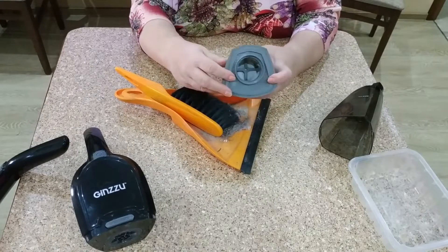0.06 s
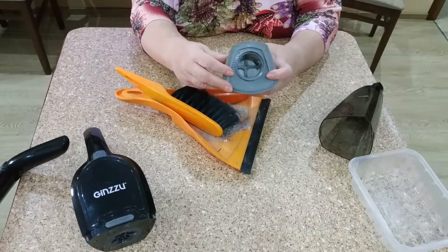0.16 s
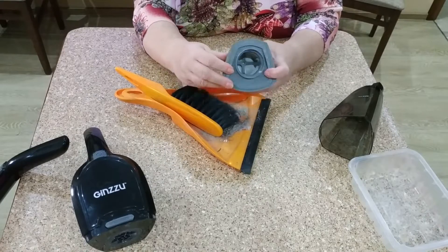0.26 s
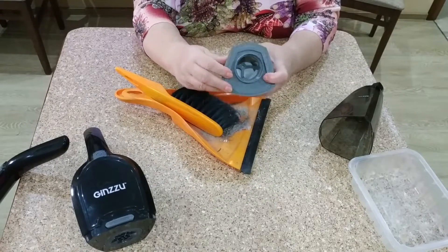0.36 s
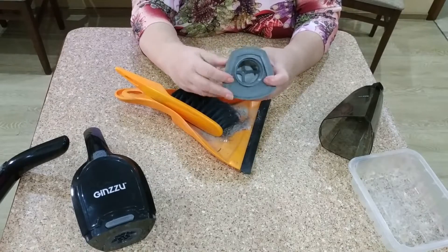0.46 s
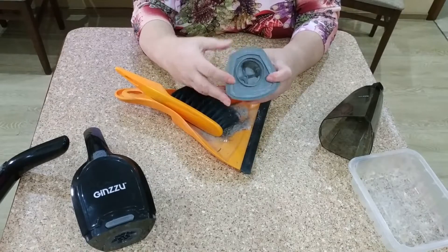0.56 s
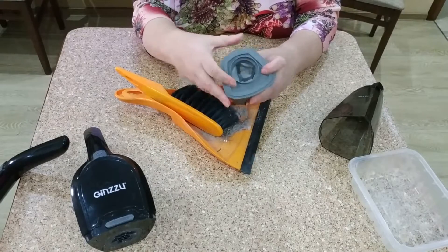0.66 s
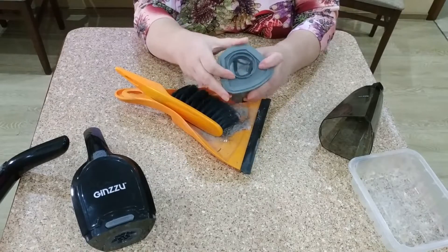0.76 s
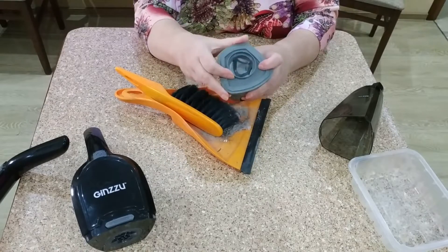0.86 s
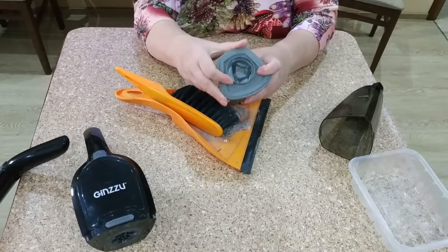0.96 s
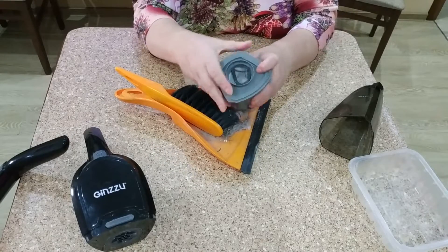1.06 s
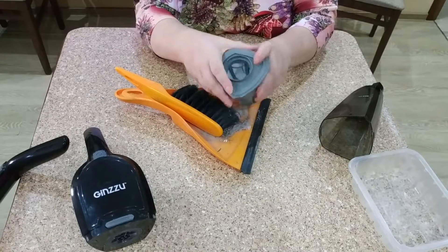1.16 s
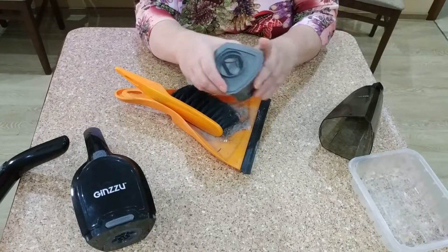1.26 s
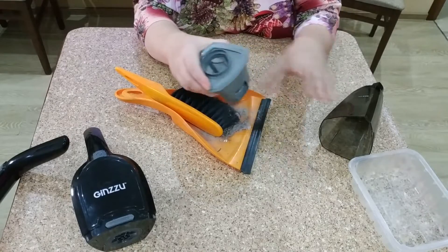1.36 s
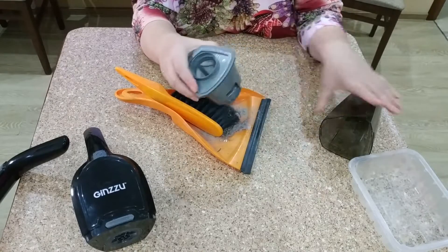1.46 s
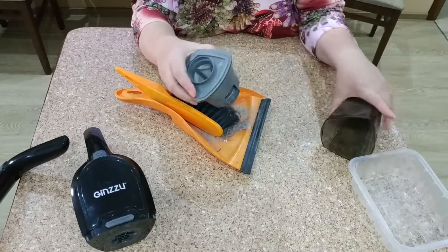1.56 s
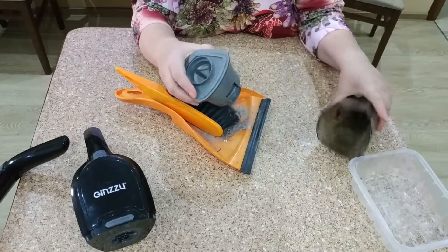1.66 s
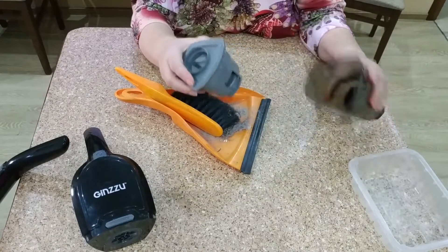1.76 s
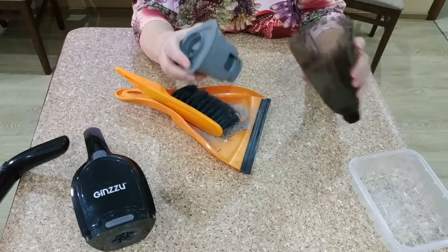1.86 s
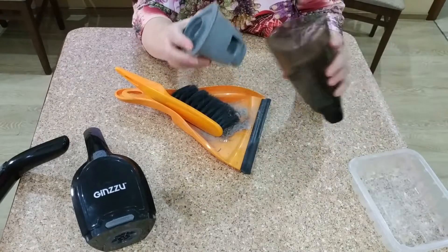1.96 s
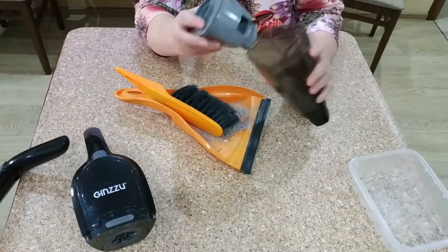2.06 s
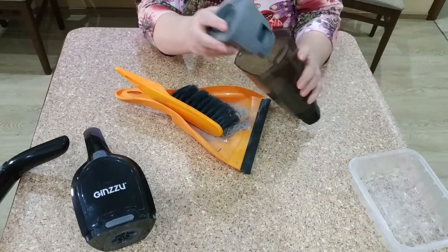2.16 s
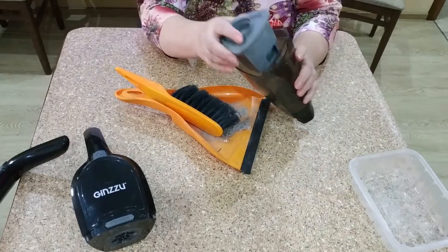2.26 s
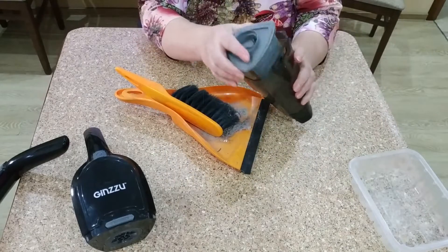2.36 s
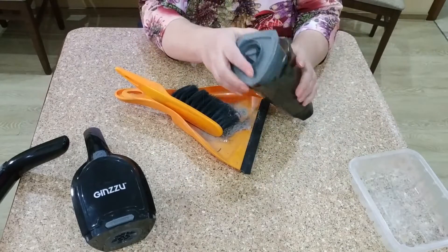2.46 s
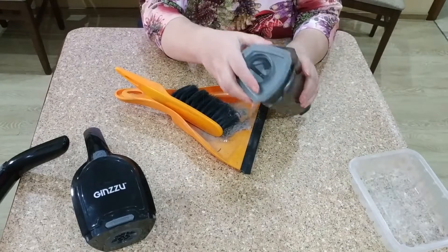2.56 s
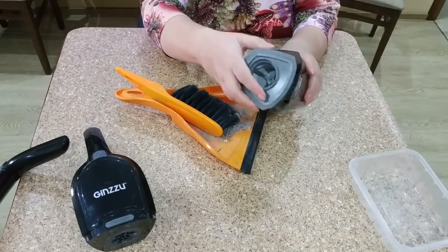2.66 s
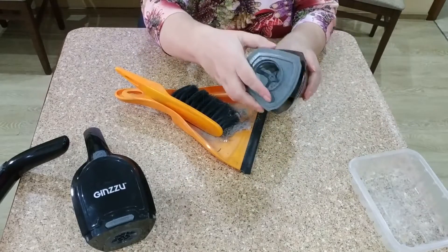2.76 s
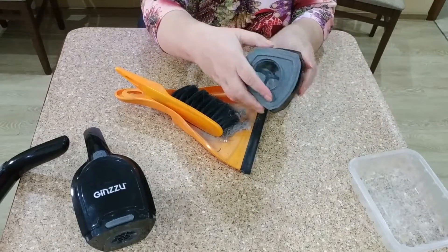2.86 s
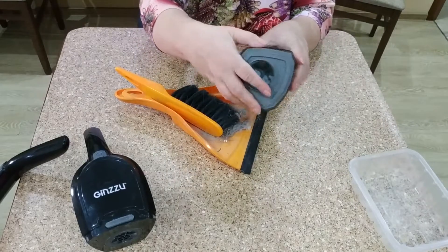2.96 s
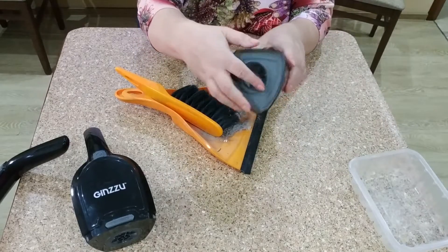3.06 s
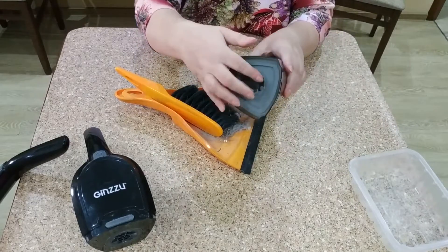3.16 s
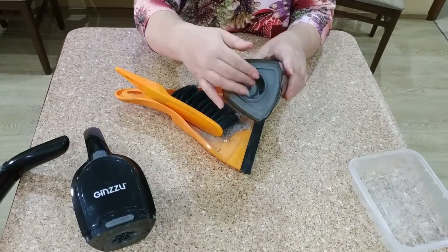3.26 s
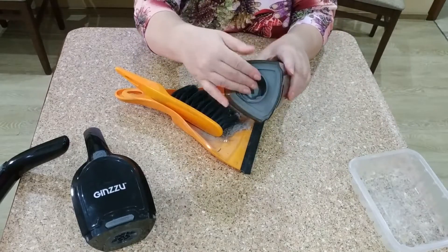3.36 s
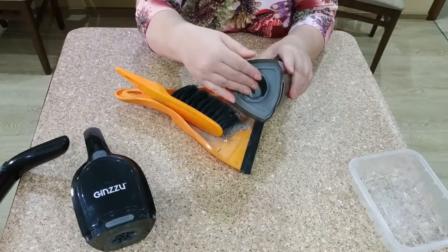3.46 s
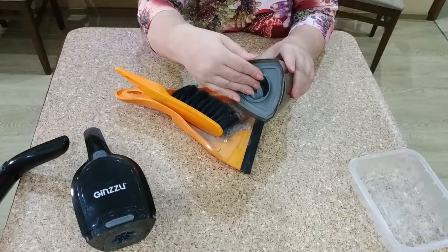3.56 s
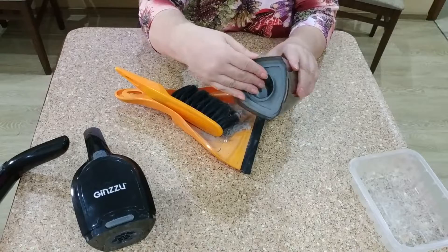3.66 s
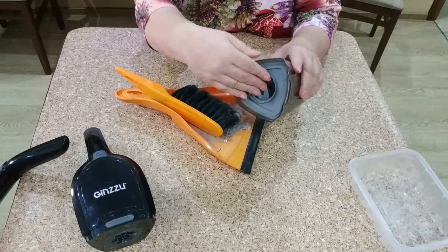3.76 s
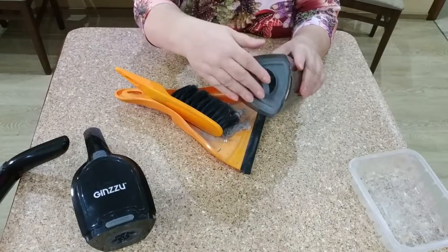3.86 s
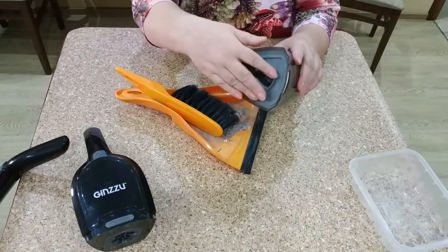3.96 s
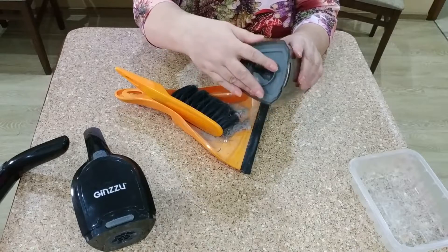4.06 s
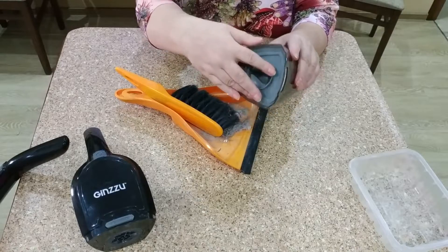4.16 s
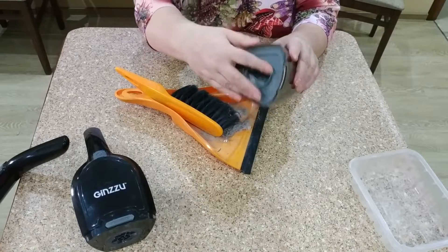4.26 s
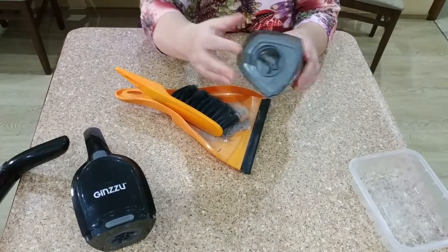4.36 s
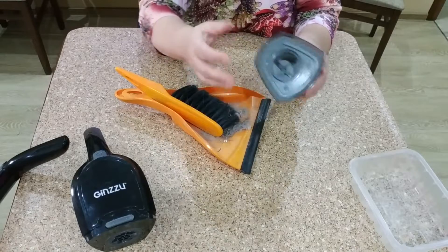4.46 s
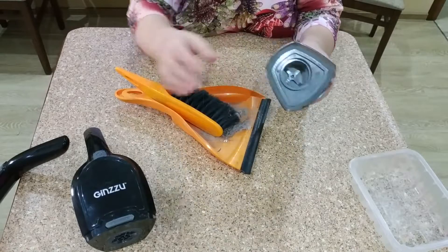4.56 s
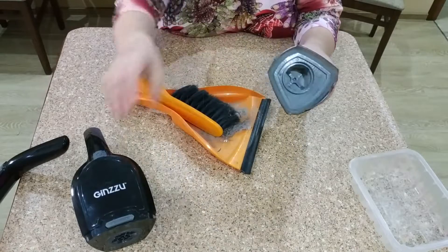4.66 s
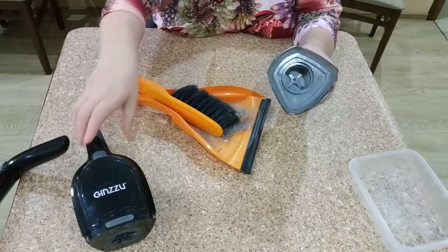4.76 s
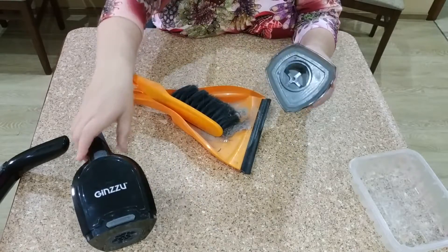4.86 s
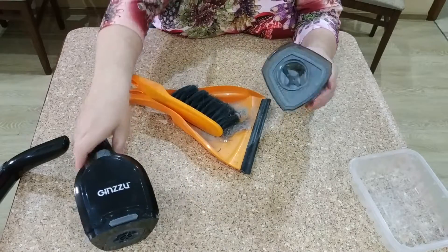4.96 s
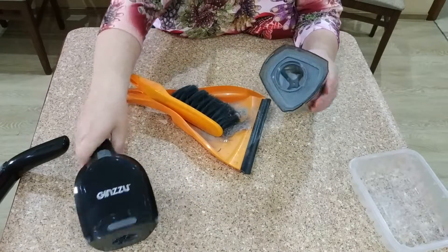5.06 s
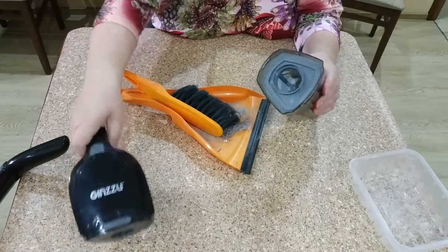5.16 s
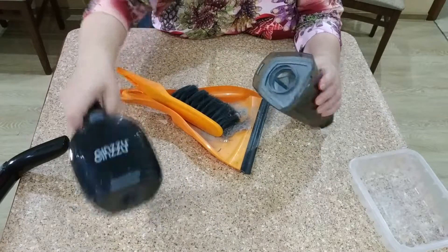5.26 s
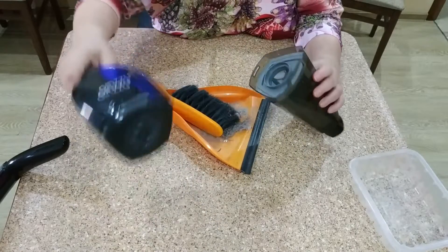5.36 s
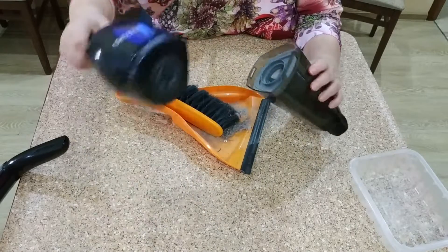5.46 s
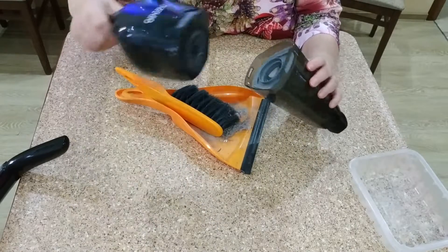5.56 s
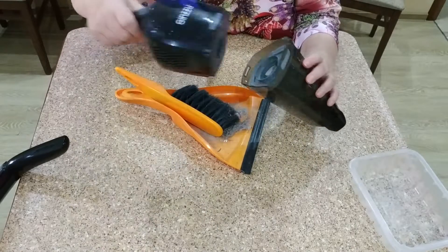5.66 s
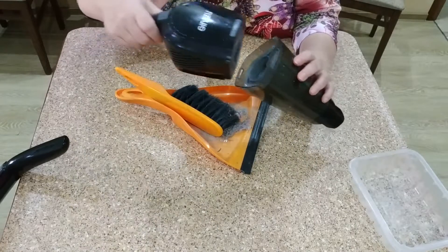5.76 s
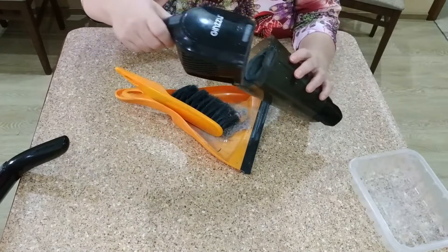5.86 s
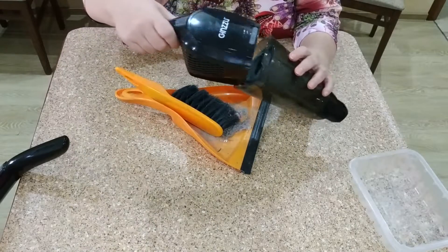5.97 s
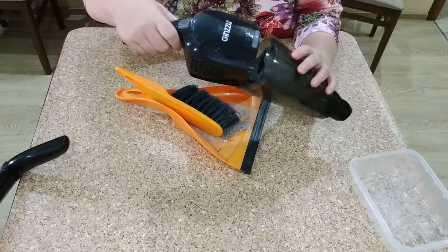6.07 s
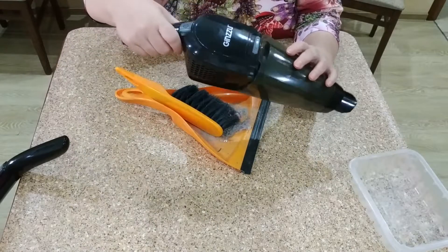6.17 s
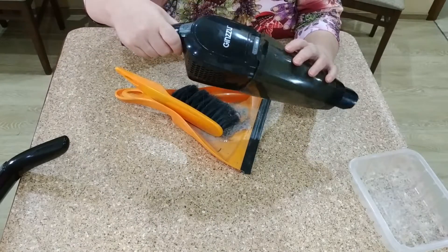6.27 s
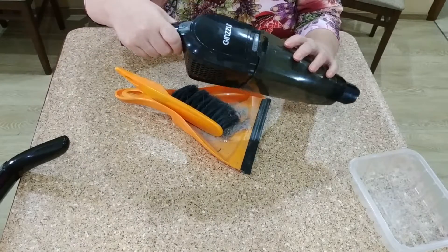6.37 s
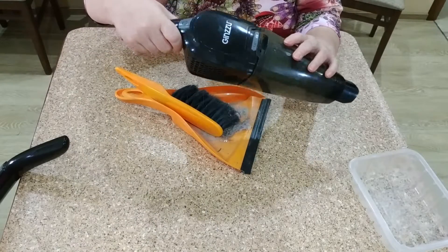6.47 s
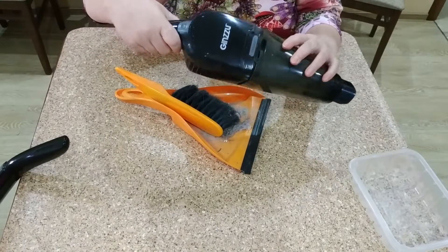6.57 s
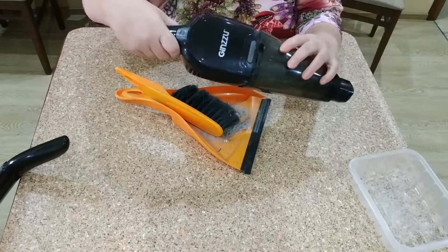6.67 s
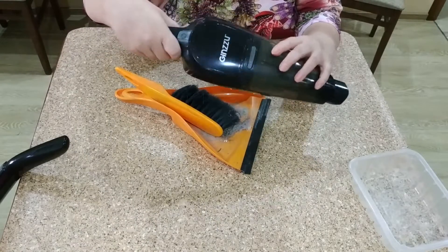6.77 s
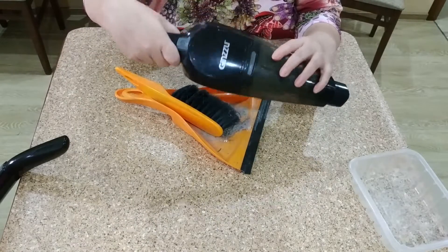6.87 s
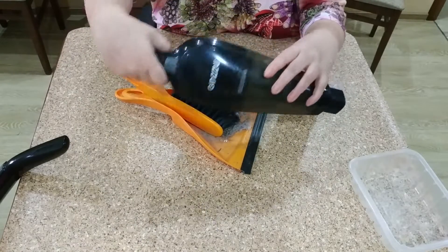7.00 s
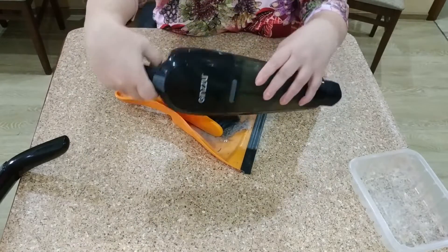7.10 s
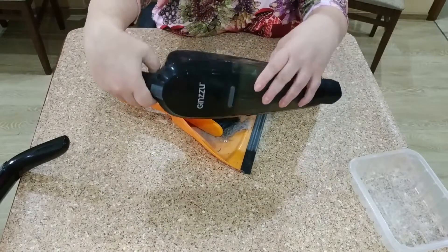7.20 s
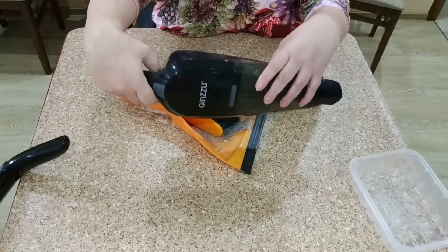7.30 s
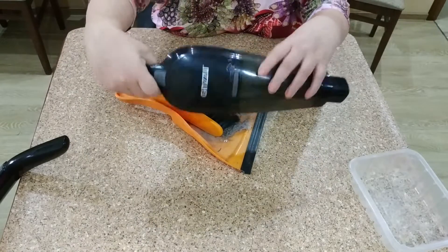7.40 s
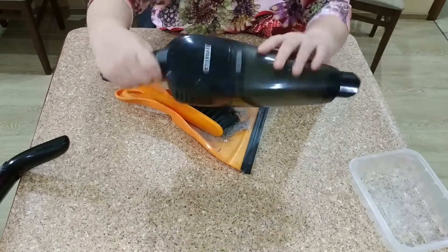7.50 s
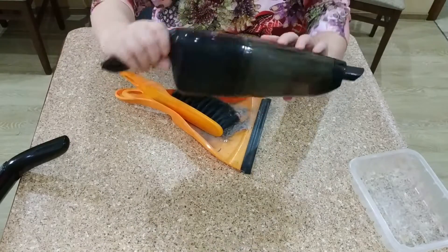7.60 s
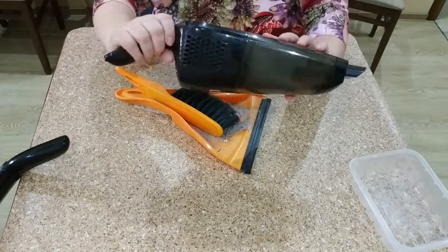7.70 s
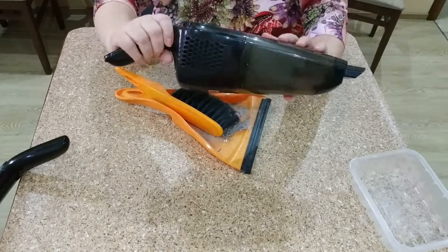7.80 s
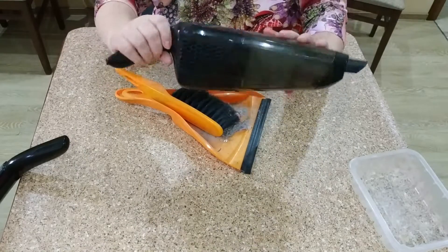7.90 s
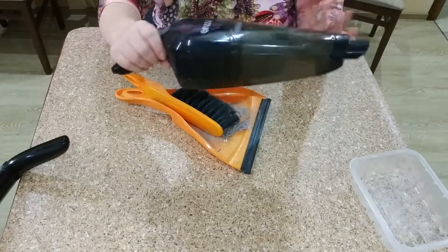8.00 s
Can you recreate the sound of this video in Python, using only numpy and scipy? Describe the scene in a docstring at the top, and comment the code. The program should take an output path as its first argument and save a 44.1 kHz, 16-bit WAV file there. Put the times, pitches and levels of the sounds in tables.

```python
"""Fingers rub plastic, then hollow knocks and sharp cracks: hands fit a filter into the dust cup of a small
vacuum cleaner and snap the cup onto the motor body, over a table in a bare, live room.
Blows excite decaying shell modes, latches add bursts of bright noise, and sliding skin is shaped noise.
Dense decaying noise forms the room; a microphone with a limiter hears it all over hiss and low room tone."""
import sys
import numpy as np
from scipy import signal
from scipy.fft import rfft, irfft
from scipy.io import wavfile
from scipy.ndimage import uniform_filter1d, minimum_filter1d

SR = 44100
rng = np.random.default_rng(int(sys.argv[2]) if len(sys.argv) > 2 else 0)


def bounce(signal):
    """Save signal as a 16-bit WAV file at the path given by the first command-line argument."""
    frames = np.transpose(np.atleast_2d(signal))
    limited = np.clip(frames, -1, 1)
    pcm = np.round(limited * 32767).astype(np.int16)
    wavfile.write(sys.argv[1], SR, pcm)


def boost_factor(decibels):
    """Convert a level in decibels to a linear amplitude factor."""
    exponent = np.asarray(decibels, float) / 20
    return 10 ** exponent


N = 354475   # length [samples]


def knocks():
    """Modal excitation by blunt blows: the air in the shell booms, its walls ring above."""
    # blows on the shells: (time [s], hollow drive [dB], hollow centre [Hz], wall drive [dB], wall centre [Hz])
    blow_table = [ (.352, -38.5, 287, -25, 950), (0.362, -57, 372, -33, 835), (.535, -58, 293, -45, 860),
                  (0.643, -59, 364, -44.5, 835), (1.295, -66, 520, -41.5, 1080),
                  (1.525, -70, 324, -38, 980), (1.685, -46, 244, -63, 1200), (1.755, -34, 302, -36.5, 1110),
                  (1.766, -20.5, 229, -30.5, 650), (1.791, -31, 310, -42, 635),
                  (2.382, -26.5, 562, -20, 890), (2.418, -36, 540, -46, 845),
                  (2.598, -15.5, 436, -36.5, 1500), (2.637, -27.5, 416, -30, 780),
                  (3.006, -17, 431, -6, 825), (3.023, -11, 425, -7.5, 798), (3.554, -55, 304, -41.5, 750),
                  (4.351, -45.5, 303, -51, 767), (4.629, -54, 310, -45, 829), (4.897, -33, 222, -27.5, 940),
                  (5.445, -53.5, 260, -44.5, 654), (5.619, -65, 362, -45.5, 829),
                  (5.978, -29.5, 340, -31, 950), (5.989, -22, 362, -24, 776), (6.107, -21, 333, -17.5, 970),
                  (6.118, -22, 306, -21, 716), (6.246, -9.5, 319, -10.5, 890),
                  (6.261, -40, 362, -47.5, 865), (6.34, -50, 356, -20.5, 960), (6.639, -57, 303, -41, 855),
                  (6.749, -29, 300, -19.5, 637), (6.773, -25, 306, -21, 930), (6.7826, -12, 342, 5.5, 924),
                  (7.7, -46.5, 300, -48, 810), (7.917, -55, 390, -45, 1510), (7.98, -57, 360, -48, 781)]
    time_s, hollow_db, hollow_hz, wall_db, wall_hz = np.transpose(blow_table)
    hollow_top_hz, wall_top_hz = 620, 1600
    hollow = strike(time_s, hollow_db, hollow_hz, 0, hollow_top_hz, fall_db=35.0, soft_hz=646)
    walls = strike(time_s, wall_db, wall_hz, hollow_top_hz, wall_top_hz, fall_db=40.3, soft_hz=1400)
    return hollow + walls


def cracks():
    """Impulsive radiation: thin high modes clack, and bright splinter noise swells and dies in each ear."""
    # hard edges and latches snapping:
    # (start [s], crack peak drive [dB], clack drive [dB], clack centre [Hz], left over right in the crack [dB])
    snap_table = [ (0.3491, -31.5, -36, 1760, -5), (0.381, -24.5, -46, 3000, 0),
                  (.539, -42, -49, 2980, 3.5), (0.834, -45, -50, 3550, -3), (1.293, -45, -55, 1660, -1),
                  (1.324, -49, -67, 4210, 1), (1.611, -33.5, -53, 2170, 1), (1.7578, -34.5, -39, 2030, 11),
                  (1.7646, -26.5, -28, 1930, 1), (2.3807, -39, -35.5, 1860, 3),
                  (2.6019, -36, -31, 1990, -2.5), (3.006, -29, -16, 2110, 3), (3.023, -31, -32, 1940, -4.5),
                  (3.065, -27, -24.5, 3080, -5.5), (3.072, -39, -15.5, 3150, -2),
                  (3.08, -15.5, -32.5, 2940, 4), (3.866, -46, -63, 3000, 0), (4.341, -36, -47.5, 3450, 3),
                  (4.8635, -45, -64, 1770, -3), (4.897, -18, -34, 1800, -1.5),
                  (5.1947, -32.5, -49, 1700, -3), (5.3522, -49, -46.5, 2060, 2),
                  (5.9772, -21.5, -32, 2790, -3), (5.989, -46, -26.5, 2780, 6),
                  (6.1072, -24.5, -25.5, 4000, -13), (6.118, -15, -18, 2870, 5),
                  (6.246, -25.5, -17.5, 2030, -14), (6.2722, -32, -44, 1680, 17),
                  (6.3391, -21, -35, 3000, -3), (6.3414, -20, -18.5, 2280, 0.5),
                  (6.749, -23.5, -30.5, 1700, 5), (6.769, -16, -16, 1980, 5), (6.781, 4, -15, 3300, -8.5),
                  (6.7836, 7, 0.5, 2350, 3), (7.46, -38.5, -62, 3790, 1), (7.555, -58, -44, 1660, -5),
                  (7.7225, -35.5, -41, 2200, -5), (7.918, -38.5, -34, 2040, 2),
                  (7.982, -36.5, -42, 3450, -8)]
    time_s, crack_db, clack_db, clack_hz, pan_db = np.transpose(snap_table)
    swell_s = 0.0005   # time a crack takes to reach its peak
    t = np.arange(2000) / SR / swell_s
    pulse = np.e * t * np.exp(-t)   # peaks at 1
    envelope = np.zeros((2, N + len(t)))
    for start, db, pan in zip(np.round(time_s * SR).astype(int), crack_db, pan_db):
        ear_db = db + np.array([[pan], [-pan]]) / 2
        envelope[:, start:start + len(t)] += boost_factor(ear_db) * pulse
    mid, side = rng.standard_normal((2, N))
    white = 0.6 * mid + 0.6 * side * [[1], [-1]]   # the ears are uncorrelated
    bright = signal.sosfilt(signal.butter(2, 3000, "high", fs=SR, output="sos"), white)
    clack = strike(time_s, clack_db, clack_hz, 1600, SR, fall_db=15.5, soft_hz=4300)
    return envelope[:, :N] * bright + clack


def strike(time_s, level_db, centre_hz, low_hz, high_hz, fall_db, soft_hz):
    """Modal superposition: a blow drives damped resonators, less so (fall_db per octave) far from its centre."""
    # modes of the plastic shells and the air in them: (frequency [Hz], level [dB], decay by 60 dB [s])
    shell_modes = [(165, -19.5, .08), (211, -2.5, 0.081), (259, 10, 0.036), (300, -5.5, 0.21),
                   (362, 2, 0.12), (417.7, 0.5, 0.1), (440, 1.5, 0.054), (540, 6, 0.06), (580, 5.5, 0.14),
                   (653, -6.5, 0.045), (720, -7, 0.11), (785, -6, 0.063), (835, -7.5, 0.11),
                   (920, -4, 0.04), (980, -11, 0.039), (1124, 2.5, 0.024), (1272, 4.5, 0.032),
                   (1463, 11, 0.032), (1666, 4, 0.0086), (1912, -5, 0.031), (2058, -10.5, 0.04),
                   (2190, -5.5, 0.013), (2514, 4.5, 0.0029), (2780, -3.5, 0.018), (3150, -4, 0.016),
                   (3550, -2, 0.015), (4000, -3, 0.0063), (4770, 11, 0.0025)]
    onset = np.round(time_s * SR).astype(int)
    ringing = np.zeros(N)
    luck = rng.standard_normal((len(time_s), len(shell_modes)))
    for k, (hz, mode_db, t60_s) in enumerate(shell_modes):
        if low_hz <= hz < high_hz:
            octaves_off = np.minimum(np.abs(np.log2(hz / centre_hz)), .55)
            drive_db = level_db + mode_db - fall_db * octaves_off + 2.0 * luck[:, k]
            clicks = np.full(N, 1e-18)
            clicks[onset] = boost_factor(drive_db) * np.sign(luck[:, k - 1])   # random polarity
            radius = boost_factor(-60 / (t60_s * SR))
            angle = 2 * np.pi * hz / SR
            poles = [1, -2 * radius * np.cos(angle), radius ** 2]
            # the zeros: a small shell radiates little below its mode
            ringing += signal.lfilter([.5, 0, -.5], poles, clicks)
    soft = np.exp(-2 * np.pi * soft_hz / SR)   # the contact lasts a moment, which rounds the attack
    return signal.lfilter([(1 - soft) ** 2], [1, -2 * soft, soft ** 2], ringing)


def rubbing():
    """Stick-slip friction: skin slides in a dense hiss of tiny slips; the shells answer with duller creaks."""
    # fingers and sleeves sliding on plastic: (loudest moment [s], length [s], swish level [dB], creak level [dB])
    stroke_table = [ (.01, 0.16, -52, -56), (0.131, 0.11, -49, -66), (0.316, 0.12, -59, -52),
                    (0.773, 0.42, -55, -68), (1.087, 0.11, -42.5, -64), (1.188, 0.069, -48, -63),
                    (1.294, 0.26, -49, -80), (1.512, 0.17, -50.5, -57), (1.643, 0.17, -52, -56),
                    (2.154, 0.14, -56.5, -64), (2.24, .12, -55, -91), (2.58, 0.48, -48.5, -53),
                    (2.85, 0.29, -50.5, -65), (2.982, 0.25, -47.5, -55.5), (3.343, 0.23, -53, -81),
                    (3.56, 0.21, -57, -55), (3.86, .2, -56, -68), (4.064, .1, -49, -55.5),
                    (4.363, 0.14, -45, -53.5), (4.636, 0.095, -89, -52.5), (5.04, 0.59, -50.5, -86),
                    (5.215, 0.11, -47, -50), (5.415, 0.41, -54, -69), (5.623, 0.11, -56.5, -66),
                    (5.85, 0.38, -82, -63), (6.628, 0.16, -78, -58), (7.17, 0.63, -53.5, -61.5),
                    (7.47, 0.13, -58, -65.5), (7.62, 0.27, -52, -57), (7.73, .12, -56, -70),
                    (7.993, .2, -54, -58.5)]
    # spectrum of the slips: (frequency [Hz], relative level per Hz [dB])
    swish_colour = [(880, -30.5), (1500, -1.5), (1920, -6), (5170, -6), (6760, -5), (11900, -1.5),
                    (15100, -3.5), (16000, 5)]
    # spectrum of the shells' answer: (frequency [Hz], relative level per Hz [dB])
    creak_colour = [(250, -8), (350, -4), (850, -0.5), (1100, -1.5), (2000, -11), (3500, -20)]
    time_s, length_s, swish_db, creak_db = np.transpose(stroke_table)
    rise_share, end_drop_db = 0.49, 20.5   # part of the length spent swelling; how far down the ends are
    rise = end_drop_db / (rise_share * length_s)
    fall = end_drop_db / ((1 - rise_share) * length_s)
    slips = rng.standard_normal(N) * boost_factor(2.0 * drift(40.0))
    sparse = rng.random(N) < 300 / SR   # about 300 stronger grains a second
    grains = rng.standard_normal(N) * (0.9 + sparse * 2.7) * boost_factor(6.6 * drift(28.0))
    # the hands never quite rest, so each envelope keeps a floor
    swish_envelope = np.hypot(peaked(time_s, swish_db, rise, fall), boost_factor(-67))
    creak_envelope = np.hypot(peaked(time_s, creak_db, rise, fall), boost_factor(-74.5))
    swish = swish_envelope * coloured(slips, swish_colour)
    return swish + creak_envelope * coloured(grains, creak_colour)


def table_top():
    """Structure-borne sound: the table top rumbles briefly as parts thud, drag or lift on it."""
    # jolts of the table top: (loudest moment [s], level [dB])
    jolt_table = [(1.5, -55), (1.634, -52.5), (1.77, -34), (4.902, -55), (5.2, -54)]
    # spectrum of the rumble: (frequency [Hz], relative level per Hz [dB])
    rumble_colour = [(110, 5), (150, 1), (200, 6.5), (300, -5), (600, -27)]
    time_s, level_db = np.transpose(jolt_table)
    envelope = peaked(time_s, level_db, rise_db_per_s=1100, fall_db_per_s=330)
    return envelope * coloured(rng.standard_normal(N), rumble_colour)


def peaked(time_s, level_db, rise_db_per_s, fall_db_per_s):
    """Power summation of envelopes that climb to a peak and fall from it in straight dB lines."""
    power, t = np.zeros(N), np.arange(N) / SR
    for peak_s, db, rise, fall in np.broadcast(time_s, level_db, rise_db_per_s, fall_db_per_s):
        near = slice(max(int((peak_s - .5) * SR), 0), int((peak_s + .5) * SR))
        down_db = np.maximum(rise * (peak_s - t[near]), fall * (t[near] - peak_s))
        power[near] += boost_factor(db - down_db) ** 2
    return np.sqrt(power)


def coloured(white, spectrum):
    """Spectral shaping: multiply the Fourier transform of a noise by a spectrum; rms 1."""
    hz = np.maximum(np.arange(N // 2 + 1) * SR / N, 20)
    slope_db = -24 * np.maximum(np.log2(spectrum[0][0] / hz), 0)   # 24 dB per octave below the first point
    return rms_one(irfft(rfft(white) * boost_factor(at_hz(spectrum, hz) + slope_db), N))


def room(direct):
    """Diffuse reverberation: convolve with noise that builds up, then decays at its own rate in each band."""
    # reverberation time: (frequency [Hz], decay by 60 dB [s])
    decay_times = [(150, 0.4), (400, 0.36), (1000, 0.43), (3000, 0.43), (8000, 0.34), (15000, 0.21)]
    # colour of the reverberation: (frequency [Hz], relative level [dB])
    tail_colour = [(150, -0.5), (400, 2), (1000, 2), (3000, 5.5), (8000, 4.5), (15000, 5)]
    # likeness of the ears in the reverberation: (frequency [Hz], left-right correlation [0 to 1])
    tail_likeness = [(100, .96), (250, .84), (500, .7), (1000, .25), (2000, .1), (8000, .05)]
    t = np.arange(SR) / SR
    tail = np.zeros((2, SR))
    for hz, band in noise_bands(tail_likeness, size=SR):
        tail += band * boost_factor(at_hz(tail_colour, hz) - 60 * t / at_hz(decay_times, hz))
    tail *= np.clip(t / 0.0037, .45, 1)   # the table top answers at once, the walls later
    tail /= np.sqrt(np.mean(np.sum(tail ** 2, axis=1)))   # unit energy
    return signal.fftconvolve(direct, tail, axes=1)[:, :N]


def still_air():
    """Stationary background noise: room tone and microphone hiss, slightly unsteady in each band."""
    # spectrum of room tone and hiss: (frequency [Hz], relative level per Hz [dB])
    still_colour = [(60, -40), (96, -55), (176, -0.5), (305, 4), (503, -5), (1020, -3), (1370, -9.5),
                    (3650, -9), (5180, -12), (12100, -11.5), (14800, -9), (16000, -32.5)]
    # likeness of the ears in the background: (frequency [Hz], left-right correlation [0 to 1])
    still_likeness = [(60, 0.52), (180, 0.63), (550, 0.12), (1650, 0.047), (4970, 0.031), (15000, 0.02)]
    noise = np.zeros((2, N))
    for hz, band in noise_bands(still_likeness, size=N):
        noise += boost_factor(at_hz(still_colour, hz) + 0.27 * drift(8.6)) * band
    return boost_factor(-57) * rms_one(noise)


def noise_bands(likeness, size):
    """Interaural correlation: stereo noise band by band, its mid and side weighted to the likeness."""
    band_edges = 80 * 2 ** np.arange(0, 7.9, .45)   # Hz
    white = rng.standard_normal((2, 2, size))
    for k, (low, high) in enumerate(zip(band_edges, band_edges[1:])):
        band_pass = signal.butter(2, [low, high], "band", fs=SR, output="sos")
        mid, side = signal.sosfilt(band_pass, white[k % 2])   # neighbouring bands stay independent
        hz = np.sqrt(low * high)
        alike = np.clip(at_hz(likeness, hz), 0, 1)
        yield hz, np.sqrt(1 + alike) * mid + np.sqrt(1 - alike) * side * [[1], [-1]]


def drift(rate_hz):
    """Low-pass random fluctuation: noise through a double pole at rate_hz, on every 40th sample; rms 1."""
    pole = np.exp(-80 * np.pi * rate_hz / SR)
    white = rng.standard_normal(N // 40 + 2002)
    slow = signal.lfilter([1], [1, -2 * pole, pole ** 2], white)[2000:]   # skip the filter's start
    return np.interp(np.arange(N) / 40, np.arange(len(slow)), rms_one(slow))


def at_hz(points, hz):
    """Logarithmic frequency scale: interpolate a table along octaves."""
    table_hz, value = np.transpose(points)
    return np.interp(np.log(hz), np.log(table_hz), value)


def rms_one(x):
    """Power normalisation: scale to unit rms."""
    return x / np.sqrt(np.mean(x ** 2) + 1e-20)


def scene():
    """Superposition: knocks, cracks and rubs close by, their room, the table top and the still air."""
    hands = knocks() + cracks() + rubbing()
    return hands + room(hands) + table_top() + still_air()


def roll_off(x):
    """The treble ends steeply here."""
    return signal.sosfilt(signal.butter(12, 16970, fs=SR, output="sos"), x)


def record(dry):
    """Band limiting and peak limiting: steep bass and top cuts, then gain that ducks ahead of loud peaks."""
    x = signal.sosfilt(signal.cheby2(10, 60, 17000, fs=SR, output="sos"), dry)
    x = signal.sosfilt(signal.cheby2(9, 27, 110, "high", fs=SR, output="sos"), x)
    over_db = np.maximum(20 * np.log10(np.abs(x).max(axis=0) + 1e-9) + 3.0, 0)   # above -3 dB full scale
    fall_db = 124.0 * np.arange(N) / SR   # release, 124 dB per s
    held_db = np.maximum.accumulate(over_db + fall_db) - fall_db
    gain_db = uniform_filter1d(minimum_filter1d(-held_db, size=201), size=201)   # ducks up to 4.5 ms ahead
    return roll_off(x * boost_factor(gain_db))


dry = scene()
out = record(dry)
bounce(out)
```